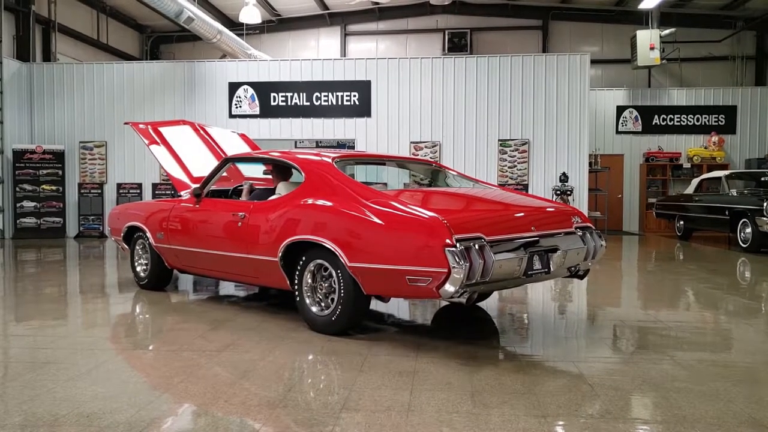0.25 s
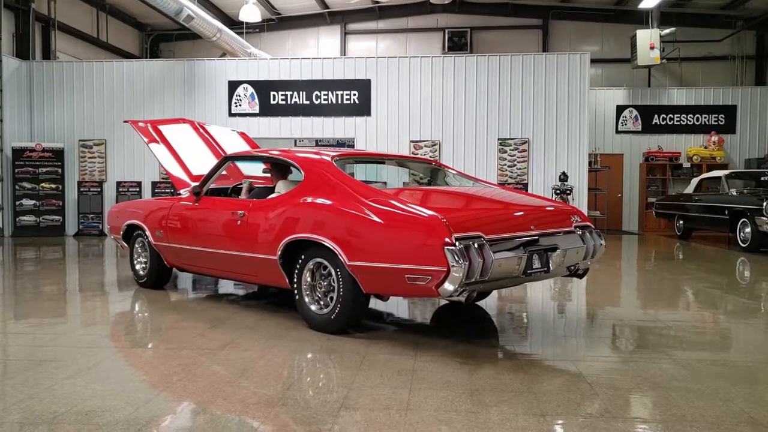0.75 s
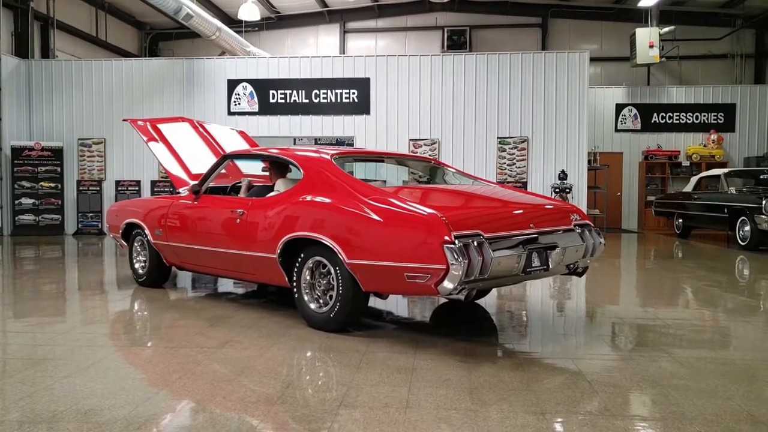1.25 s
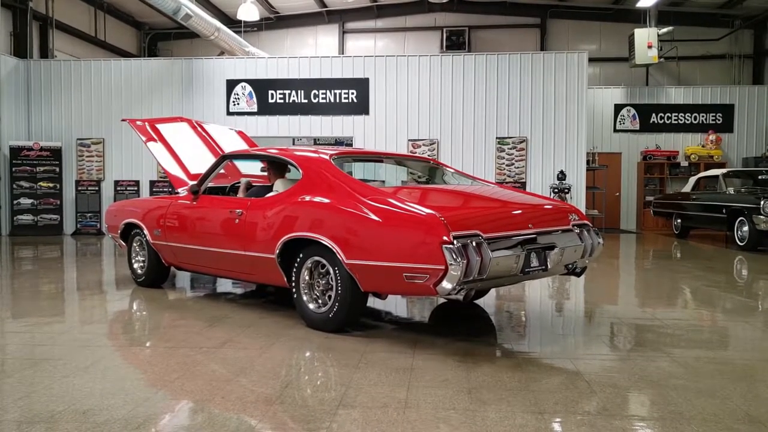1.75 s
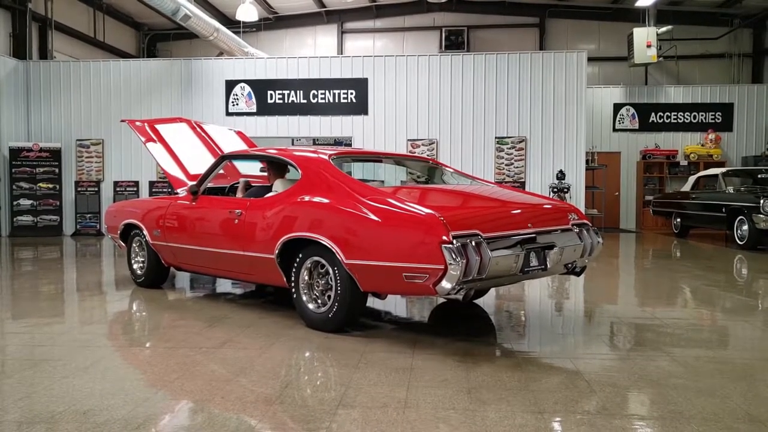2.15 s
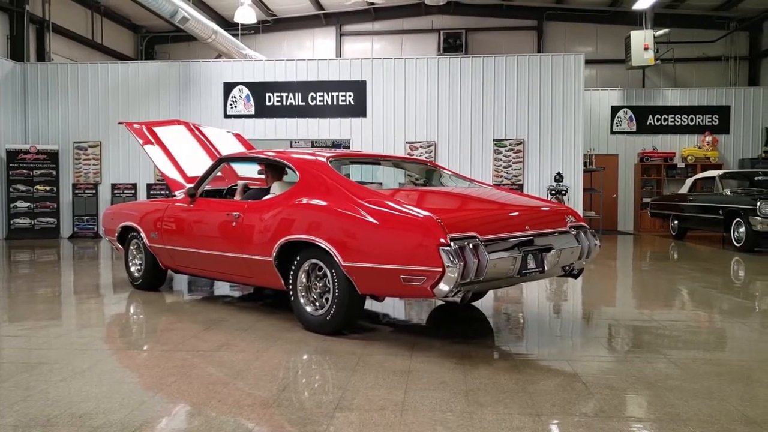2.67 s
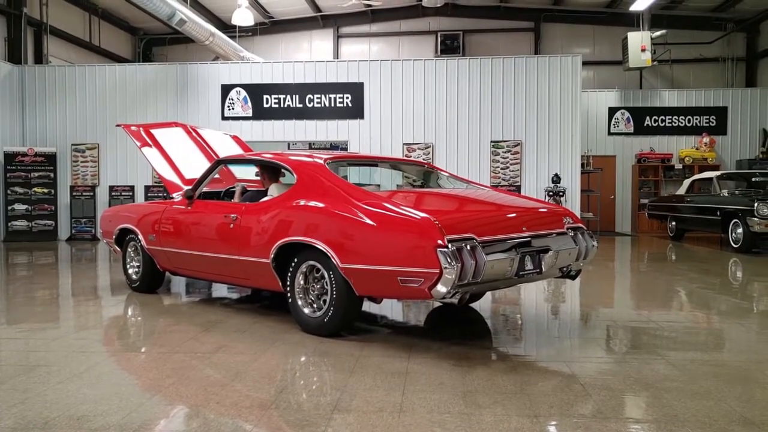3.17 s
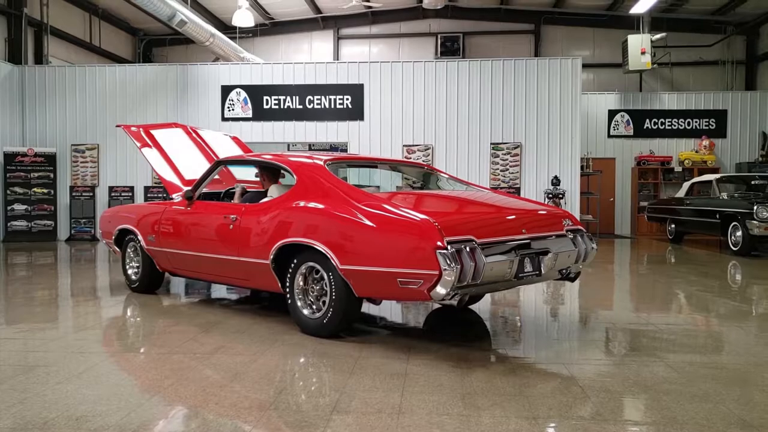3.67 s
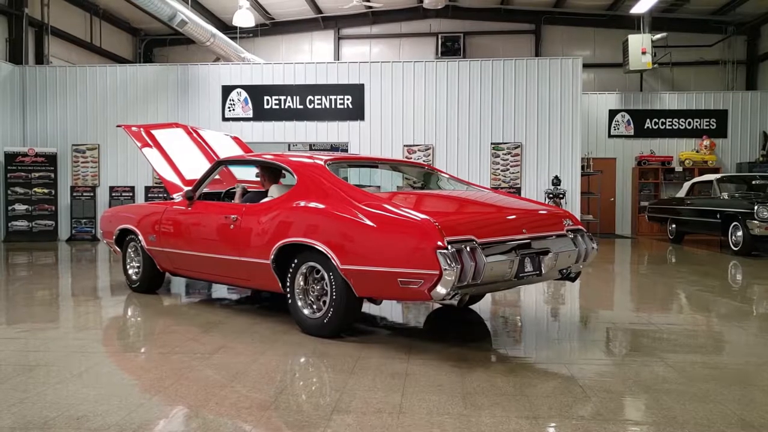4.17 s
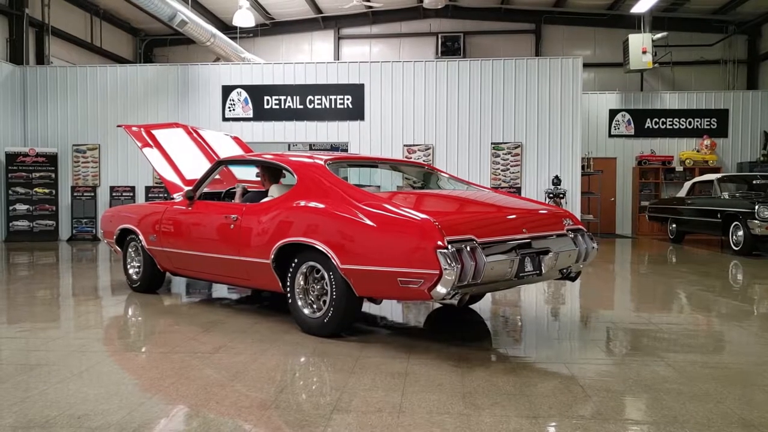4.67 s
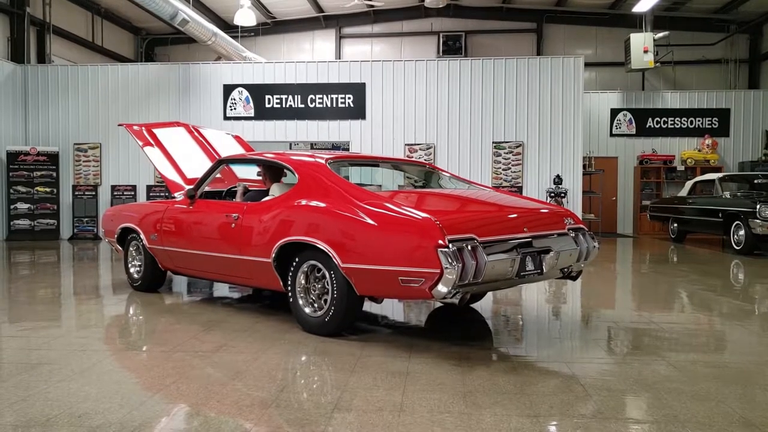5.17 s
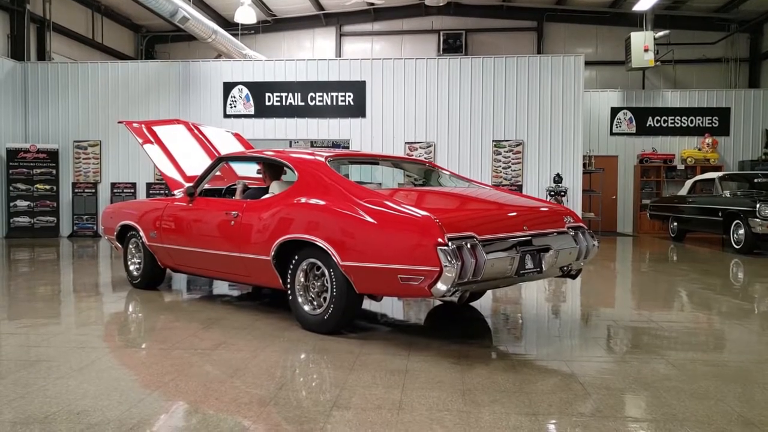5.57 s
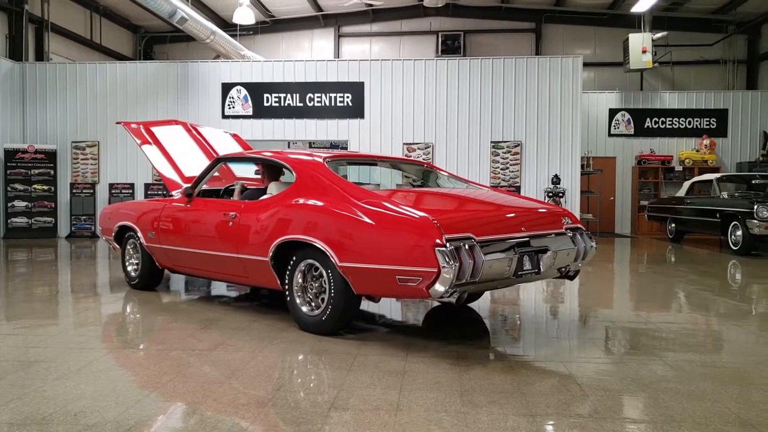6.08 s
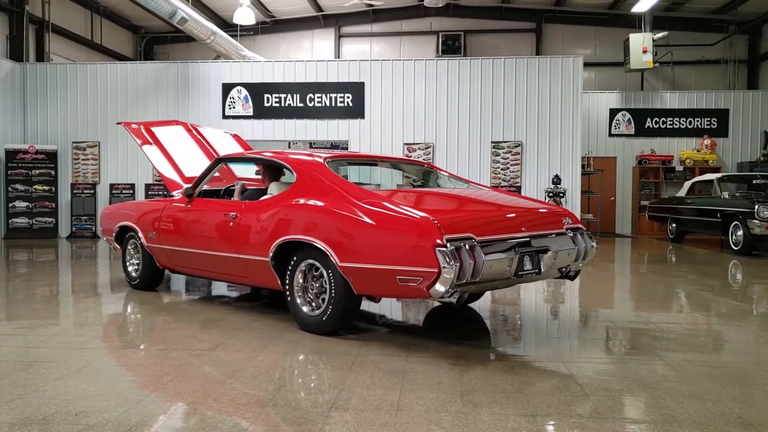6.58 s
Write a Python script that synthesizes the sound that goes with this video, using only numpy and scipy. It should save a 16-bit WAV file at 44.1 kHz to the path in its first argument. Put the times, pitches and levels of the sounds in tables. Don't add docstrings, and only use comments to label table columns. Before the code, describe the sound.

Deep uneven V8 idle with light valve ticking; one quick throttle blip roars up early, falls away over two seconds and settles into steady rumble.

```python
import sys
import numpy as np
from scipy import signal
from scipy.fft import rfft, irfft, next_fast_len
from scipy.io import wavfile
from scipy.ndimage import uniform_filter1d

SR = 44100
rng = np.random.default_rng(int(sys.argv[2]) if len(sys.argv) > 2 else 0)


def ratio(d):
    e = np.asarray(d, float) / 20
    return 10 ** e


def master(y):
    cut = np.clip(np.atleast_2d(y).T, -1, 1)
    pcm = np.round(cut * 32767)
    wavfile.write(sys.argv[1], SR, pcm.astype(np.int16))


N = 301203

IDLE_FIRINGS = 66.5

# (time [s], gain [dB])
GAIN_CONTROL = [
    (1.2, 0.5),
    (1.6, -3.5),
    (3.4, -4.5),
    (3.8, -3.5),
    (4.5, -0.93),
    (5.3, -0.5),
]


def in_time(rows):
    s, *columns = np.transpose(rows)
    return [np.interp(np.arange(N) / SR, s, c) for c in columns]


def at_hz(points, hz):
    table_hz, value = np.array(points).T
    return np.interp(np.log(hz), np.log(table_hz), value)


def drift(rate):
    r = np.exp(-80 * np.pi * rate / SR)
    slow = signal.lfilter([1], [1, -2 * r, r * r], rng.standard_normal(N // 40 + 4002))[4000:]
    return np.interp(np.arange(N) / 40, np.arange(len(slow)), slow / slow.std())


def swelling(events):
    t = np.arange(N) / SR
    return sum(db * np.exp(-((t - s) / width) ** 2) for s, db, width in events)


def evened(x, span_s=0.76):
    power = np.mean(np.atleast_2d(x) ** 2, axis=0)
    for _ in range(2):
        power = uniform_filter1d(power, int(span_s * SR))
    return x / np.sqrt(power + 1e-12)


def band(x, low_hz, high_hz, order=2):
    edges_hz = [low_hz, min(high_hz, .45 * SR)]
    return signal.sosfilt(signal.butter(order, edges_hz, "band", fs=SR, output="sos"), x)


def coloured(x, spectrum):
    hz = np.maximum(np.arange(N // 2 + 1) * SR / N, 1)
    return irfft(rfft(x) * ratio(at_hz(spectrum, hz)), N)


def resonate(x, modes):
    out = 0
    for k, (hz, width, db) in enumerate(modes):
        r = np.exp(-np.pi * width / SR)
        top = ratio(db) * (-1) ** k * (1 - r * r) / 2
        out = out + signal.lfilter([top, 0, -top], [1, -2 * r * np.cos(2 * np.pi * hz / SR), r * r], x)
    return out


def revved(firing):
    return np.clip((firing - 85) / 50, 0, 1)


def loudness(layer, firing):
    # (time [s], extra effort [dB])
    foot = [
        (1.02, 1.5),
        (1.09, 4),
        (1.125, 7.5),
        (1.19, 6),
        (1.24, 10.5),
        (1.285, 8),
        (1.36, 8.5),
        (1.46, 4.5),
        (1.56, 3),
    ]
    layers = {"boom": (-18, -4, 0.17, 1.42), "growl": (-23.5, 8.5, 0.13, 1.42),
              "roar": (-33.5, 8.5, 0.12, 0.75), "gear": (-38, 7.5, 0.72, 0.93),
              "fan": (-39.5, 9, 0.82, 1.2), "intake": (-45.5, 8.5, 0.99, 1.14)}
    idle_db, doubling_db, throttle, duck = layers[layer]
    speed_db = doubling_db * np.log2(firing / IDLE_FIRINGS)
    return idle_db + speed_db + throttle * in_time(foot)[0] + duck * in_time(GAIN_CONTROL)[0]


def orders(firing, cycle):
    slot_idle = [0, -14, -8, 0, -6, -8, -12, -10]
    slot_revved = [3, -16, -14, -18, 0, -12, -14, -10]
    single_orders = {7: -6, 17: 5, 20: -9, 29: 5, 33: 5, 36: 8}
    # (frequency [Hz], level [dB])
    pipes = [(35, -42), (56, -18), (66, 0), (93, -2.5), (101, -17), (120, -12), (134, -24), (150, -16),
             (159, -8), (171, -15), (200, -26), (230, -15), (265, -28), (360, -32)]
    # (time [s], level [dB], half width [s])
    pipe_rings = [
        (.5, 8, 1.),
        (5.2, 8, .3),
        (5.92, 7, .22),
        (6.6, 3, .4),
    ]
    step = 8
    boom, growl = 0, 0
    slow_firing, slow_cycle = firing[::step], cycle[::step]
    rev, ring_db = revved(slow_firing), swelling(pipe_rings)[::step] - 2
    for k in range(2, 45):
        hz = k * slow_firing / 8
        slot_db = (1 - rev) * (slot_idle[k % 8] + single_orders.get(k, 0)) + rev * slot_revved[k % 8]
        ring = ring_db * np.exp(-((hz - 159) / 8) ** 2)
        pipe_db = at_hz(pipes, hz) + ring - 60 * (hz > 380)
        level_db = slot_db + pipe_db + 1.5 * drift(3.4)[::step]
        spread = .22 - k * k / 8
        line = ratio(level_db) * np.cos(2 * np.pi * (k * slow_cycle + spread))
        low = np.clip((115 - hz) / 10, 0, 1)
        boom, growl = boom + low * line, growl + (1 - low) * line
    return [evened(signal.resample_poly(v, step, 1)[:N]) for v in (boom, growl)]


def puffs(cycle, spread):
    fired = np.diff(np.floor(8 * cycle), prepend=0) > 0
    return fired * rng.standard_normal(N) + spread * rng.standard_normal(N)


def fan_and_pumps(firing, cycle):
    # (order [per cycle], level against the growl [dB])
    pumps = [
        (9.5, -8),
        (18.5, -12),
    ]
    hum = ratio(-2 + drift(1)) * np.sin(2 * np.pi * 14.5 * cycle)
    for order, db in pumps:
        hum = hum + ratio(db + 2 * drift(1.3)) * np.sin(2 * np.pi * order * cycle)
    return hum * (1 - revved(firing))


def exhaust(firing, cycle, kicks, wide):
    # (frequency [Hz], width [Hz], level [dB])
    boom_modes = [(70, 18, -5), (90, 18, 0)]
    growl_modes = [(125, 29, -5), (163.6, 38.7, -3), (201.8, 41.3, -4), (234.3, 32.7, -3),
                   (274, 23.3, -7.5), (303, 22.6, -4.5), (385, 38, -13.5)]
    roar_modes = [(414.5, 20.3, 2.5), (506, 40, 0.5), (562, 30.3, 3.5), (635, 30, 2), (694.6, 28, 1),
                  (777, 63, -5), (884, 30, -9.5)]
    # (time [s], level [dB], half width [s])
    boom_swells = [(1.12, 4.5, 0.047), (1.22, 7, .06), (1.36, 8, 0.078), (1.48, 14.5, 0.075),
                   (1.62, 6.5, 0.066), (1.73, 12, 0.071), (1.85, 2, .03), (2.29, 2, .06),
                   (2.45, -4.5, 0.13), (2.79, 8.5, 0.1), (3.03, -3, 0.074), (3.19, 3.5, 0.063),
                   (3.46, 3, 0.046)]
    # (time [s], level [dB], half width [s])
    growl_swells = [
        (1.05, 4, 0.069),
        (1.2, -2.5, 0.089),
        (1.36, 2, 0.043),
        (1.74, 1, 0.03),
        (2.56, 2, 0.054),
        (2.75, 3, 0.056),
        (5.23, 2.5, .15),
    ]
    boom_db = loudness("boom", firing) + swelling(boom_swells)
    growl_db = loudness("growl", firing) + swelling(growl_swells)
    roar_db = loudness("roar", firing)
    uneven = ratio(-18 + 13 * np.clip((firing - 71) / 22, 0, 1))
    rush = 0.053 * rng.standard_normal((2, N))

    boom, growl = orders(firing, cycle)
    boom = boom + uneven * evened(band(resonate(kicks + .3 * wide, boom_modes), 57., 120.))

    puff_growl = evened(resonate(kicks + 2.03 * rush[0] + 0.73 * wide, growl_modes))
    growl = ratio(6 * revved(firing)) * growl
    growl = growl + fan_and_pumps(firing, cycle) + ratio(15.5) * uneven * puff_growl

    roar = evened(band(resonate(kicks + 1.87 * rush[1] + 2.14 * wide, roar_modes), 375.0, 1400.0))
    rasp = evened(band(kicks + rush + wide, 860.0, 1370.0))
    roar = roar + ratio(-5.5) * revved(firing) ** .5 * rasp

    shake = band(rng.standard_normal(N), 30., 55.)
    rumble = ratio(roar_db - 10.5) * evened(shake)
    low = ratio(boom_db) * evened(boom, 0.37) + ratio(growl_db) * evened(growl, 0.36) + rumble
    low = np.array([np.roll(low[0], 3), low[1]])
    return low * ratio([[1.5], [-1.8]]) + ratio(roar_db) * roar * ratio([[1.1], [-1.1]])


def hiss(firing, cycle, patchy_db, beat_db):
    # (frequency [Hz], density [dB per Hz])
    air = [(600, 11), (900, -4.5), (1200, -2.5), (1390, -5), (1900, -3), (2300, -3.5), (2750, -8),
           (3300, -8), (4610, -9), (4910, -11.5), (7510, -12.5), (8610, -20), (10700, -16), (15900, -16.5)]
    # (frequency [Hz], left-right likeness [0-1])
    likeness = [(900, .2), (1400, .12), (2200, .12), (3100, .05), (6800, 0), (15000, 0)]
    # (frequency [Hz], left minus right [dB])
    lean = [(900, 2), (2400, 1.4), (4400, 2), (6500, 4), (9000, 5), (13000, 6.5)]
    edges = [800, 1150, 1700, 2600, 3800, 5500, 8000, 11500, 17000]
    together = drift(9.)
    white = coloured(rng.standard_normal((2, 2, N)), air)
    beat = np.cos(2 * np.pi * cycle) * drift(0.76) + np.cos(2 * np.pi * 3 * cycle)
    parts = np.zeros((3, 2, N))
    for k, (low, high) in enumerate(zip(edges, edges[1:])):
        mid, side = band(white[k % 2], low, high, order=3)
        hz = np.sqrt(low * high)
        alike = np.clip(at_hz(likeness, hz), -1, 1)
        gain_db = patchy_db * (0.34 * together + drift(9.4)) + beat_db * beat
        pair = np.sqrt(1 + alike) * mid + np.sqrt(1 - alike) * side * [[1], [-1]]
        balance = ratio(at_hz(lean, hz) * np.array([[.5], [-.5]]))
        parts[k // 3] += ratio(gain_db) * balance * pair
    out = 0
    for layer, part in zip(("gear", "fan", "intake"), parts):
        out = out + ratio(loudness(layer, firing) + 1.0) * evened(part, 0.29)
    return out


def clatter(firing):
    gear_db, intake_db = loudness("gear", firing), loudness("intake", firing)
    sizes = ratio(3.4 * np.minimum(rng.exponential(1, (3, N)), 4.5)) * rng.choice([-1, 1], (3, N))
    clicks = sizes * (rng.random((3, N)) < 200. / SR) + 1e-18
    clicks = clicks[:2] + 0.62 * clicks[2]
    # (frequency [Hz], width [Hz], level [dB])
    covers = [(1169, 21, -1.5), (1550, 81, 1.0), (1750, 91, 1), (1960, 34, -5), (2060, 83, 2.0),
              (2180, 140, -0.5), (3270, 47, -6.0), (3510, 29, 1.0), (4510, 50, -1)]
    shield = ratio(intake_db - 14.0) * evened(band(clicks, 11000.0, 18000.0), .5) * ratio([[2.], [-4.]])
    return ratio(gear_db - 11.0 + 1.2 * revved(firing)) * evened(resonate(clicks, covers), 0.48) + shield


def struck(events, decay_s, crack, crack_hz, boost_db):
    out, t = np.zeros(N), np.arange(int(.06 * SR)) / SR
    shape = (1 - np.exp(-t / 0.002)) * np.exp(-t / decay_s)
    grits = band(rng.standard_normal((len(events), len(t))), *crack_hz)
    for (s, peak_db, hz), grit in zip(events, grits):
        i = max(round((s - .001) * SR), 0)
        blow = np.sin(2 * np.pi * hz * t) + crack * grit
        out[i:i + len(t)] += (ratio(peak_db + boost_db) * shape * blow)[:N - i]
    return out


def tappet(firing, cycle):
    # (time [s], peak [dB], ring [Hz])
    loud_ticks = [(0.2528, -24.5, 3480), (1.0834, -29, 3150), (1.1192, -24, 3400), (1.1937, -23, 3520),
                  (1.2281, -13, 3490), (1.3098, -16.5, 3250), (1.3792, -15.5, 3140), (1.4361, -16.5, 3550),
                  (3.695, -34, 3240), (3.932, -31.5, 3260), (4.05, -26.5, 3190), (4.2867, -33, 3220),
                  (4.7623, -30, 3180), (5.002, -29, 3270), (5.1223, -30, 3210), (5.3657, -28.5, 3240),
                  (5.607, -28, 3210), (5.7229, -29, 3160), (6.4395, -28, 3180), (6.5577, -25.5, 3180)]
    # (time [s], peak [dB], ring [Hz])
    loud_knocks = [(1.0784, -24, 1690), (1.1278, -22, 1534), (1.1887, -29, 2120), (1.2281, -20, 2180),
                   (1.2805, -20, 2190), (1.3096, -12.5, 2010), (1.3110, -18, 1440), (1.3384, -17, 1960),
                   (1.3778, -8, 2080), (1.4017, -14.5, 1550), (1.4341, -13, 2070), (1.471, -16.5, 2060),
                   (1.548, -20, 1540), (1.5893, -26, 2260), (1.6921, -21, 1550), (3.8114, -30, 1730),
                   (4.5261, -29, 1710), (4.6453, -29, 2110), (4.9982, -27, 1960), (5.246, -28, 1900),
                   (5.5119, -33, 1840), (5.9913, -33, 1730)]
    # (part of cycle [0-1], tick [dB], tick ring [Hz], knock [dB], knock ring [Hz])
    cam = [
        (.045, -36, 3230, -33, 1850),
        (.405, -38.5, 3250, -36.5, 2040),
        (.68, -41.5, 3560, -40, 1750),
    ]
    cushion_db = -38 * np.log2(firing / IDLE_FIRINGS)
    gain_db = in_time(GAIN_CONTROL)[0] + cushion_db
    level_spread_db, ring_spread = 2.0, 0.039
    ticks, knocks = list(loud_ticks), list(loud_knocks)
    loud_s = np.array(loud_ticks)[:, 0]
    for part, tick_db, tick_hz, knock_db, knock_hz in cam:
        at = np.flatnonzero(np.diff(np.floor(cycle - part)))
        at = at[np.abs(at[:, None] / SR - loud_s).min(axis=1) > .012]
        luck = rng.standard_normal((len(at), 4))
        tick_peaks = tick_db + gain_db[at] + level_spread_db * luck[:, 0]
        ticks += zip(at / SR, tick_peaks, tick_hz * (1 + 0.31 * ring_spread * luck[:, 1]))
        knock_peaks = knock_db + gain_db[at] + level_spread_db * luck[:, 2]
        knocks += zip(at / SR, knock_peaks, knock_hz * (1 + 1.5 * ring_spread * luck[:, 3]))
    bright = struck(ticks, decay_s=0.0049, crack=1.45, crack_hz=(3000., 4300.), boost_db=4.5)
    dull = struck(knocks, decay_s=0.0058, crack=2.95, crack_hz=(1450., 2300.), boost_db=1.2)
    return bright + dull


def hall(x, t60, cut_hz):
    size = next_fast_len(N + 2 * SR)
    hz = np.arange(size // 2 + 1) * SR / size
    decay = t60 / (1 + hz / cut_hz)
    sides = []
    for lags in rng.uniform(.03, .09, (2, 8)):
        loops = [ratio(-60 * lag / decay) * np.exp(-2j * np.pi * hz * lag) for lag in lags]
        sides.append(sum(g * np.sqrt(1 - abs(g) ** 2) / (1 - g) for g in loops) / np.sqrt(len(lags)))
    return irfft(rfft(x, size)[..., None, :] * np.array(sides), size)[..., :N]


def open_intake(bay, firing):
    climb = np.gradient(uniform_filter1d(firing, SR // 10)) * SR
    opening = np.clip(climb / 150, 0, 1)
    return bay - 0.48 * opening * resonate(bay, [(2570, 400, 0)])


def scene():
    # (time [s], speed [firings per s])
    speed = [(0.0, 65.14), (0.883, 66.72), (1.007, 66.18), (1.197, 81.33), (1.264, 102.15), (1.372, 146.6),
             (1.476, 175.81), (1.561, 178.02), (1.756, 162.77), (2.278, 100.36), (2.452, 90.53),
             (2.976, 74.76), (3.319, 70.43), (3.759, 67.34), (4.768, 67.44), (5.276, 65.55), (5.67, 67.64),
             (6.83, 66.42)]
    firing, = in_time(speed)
    cycle = .993 + np.cumsum(firing) / SR / 8
    kicks, blows = puffs(cycle, spread=0.048), tappet(firing, cycle)
    wide, echoes = hall(np.array([kicks, blows]), t60=1.53, cut_hz=4500.0)
    bay = hiss(firing, cycle, patchy_db=0.64, beat_db=0.24) + clatter(firing)
    bay = bay + blows * ratio([[.7], [-.7]]) + ratio(-11.0) * echoes
    return exhaust(firing, cycle, kicks, wide) + open_intake(bay, firing)


def roll_off(x):
    return signal.sosfilt(signal.butter(12, 16160, fs=SR, output="sos"), x)


def record(dry):
    # (frequency [Hz], level [dB])
    top_edge = [(15940, 0), (16150, -110)]
    mix = coloured(np.clip(dry, -1, 1), top_edge)
    return roll_off(mix)


dry = scene()
out = record(dry)
master(out)
```